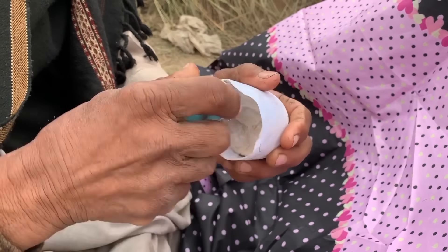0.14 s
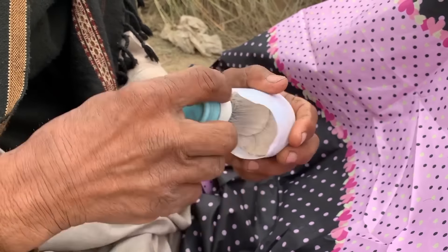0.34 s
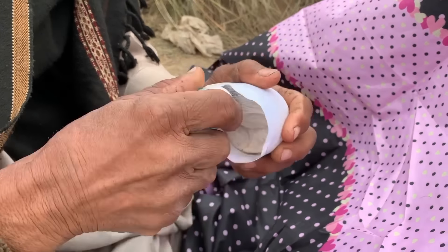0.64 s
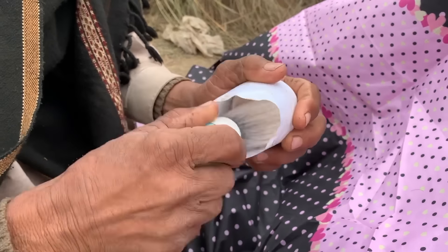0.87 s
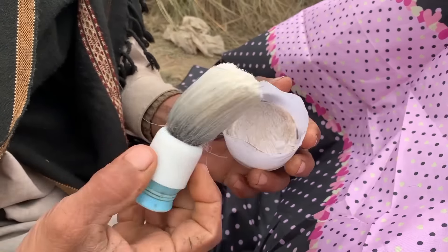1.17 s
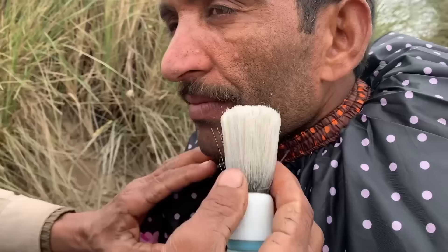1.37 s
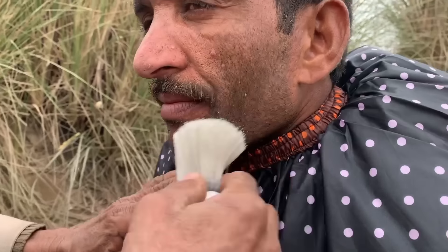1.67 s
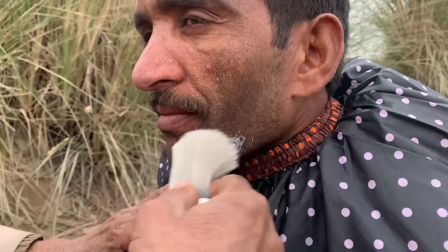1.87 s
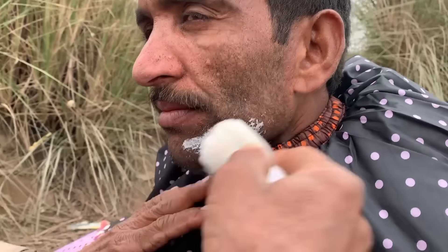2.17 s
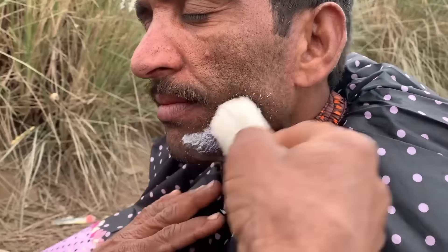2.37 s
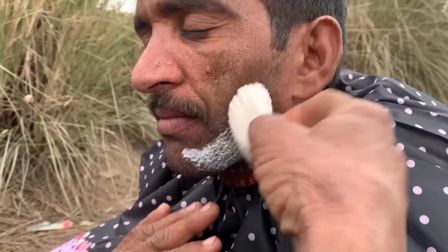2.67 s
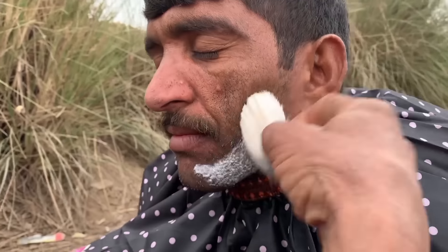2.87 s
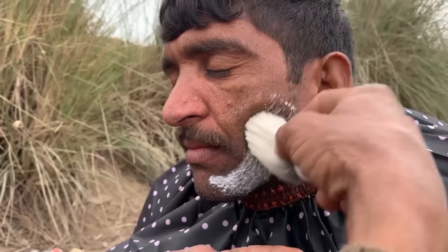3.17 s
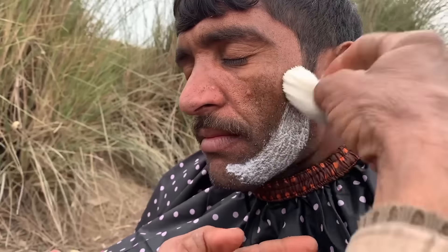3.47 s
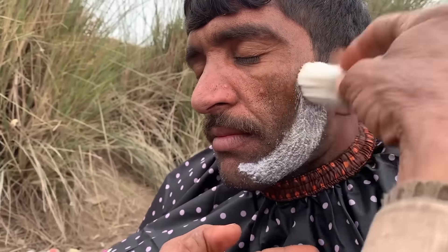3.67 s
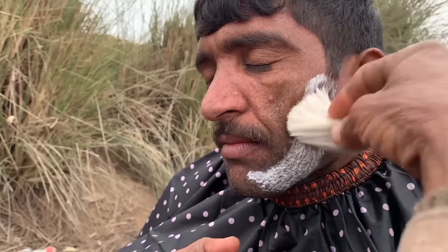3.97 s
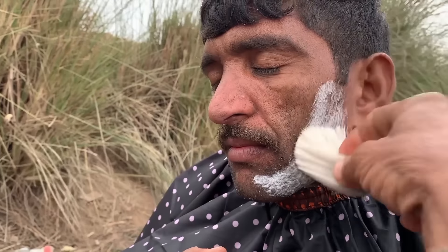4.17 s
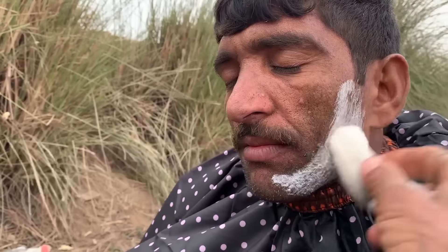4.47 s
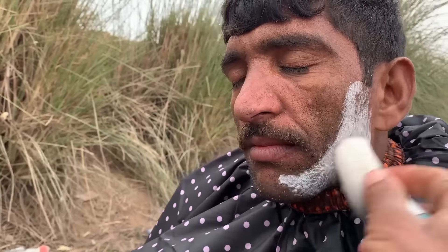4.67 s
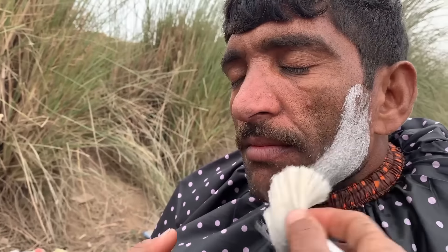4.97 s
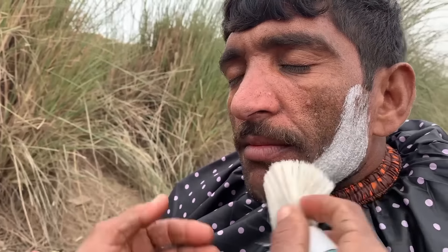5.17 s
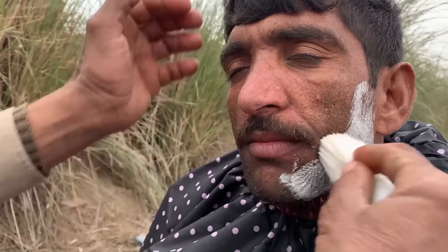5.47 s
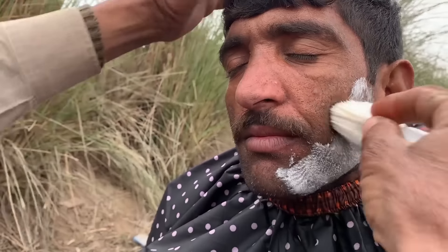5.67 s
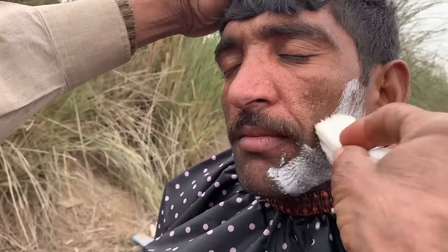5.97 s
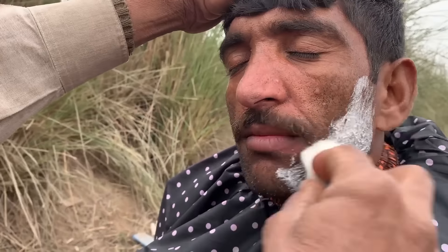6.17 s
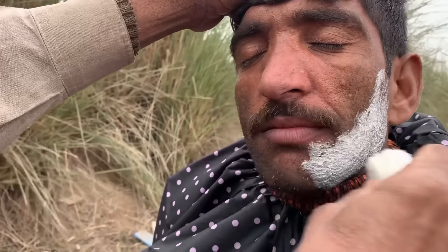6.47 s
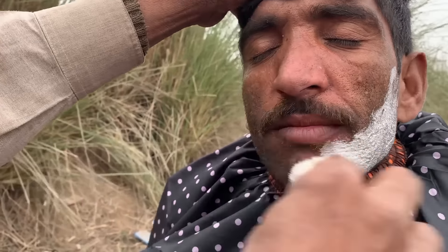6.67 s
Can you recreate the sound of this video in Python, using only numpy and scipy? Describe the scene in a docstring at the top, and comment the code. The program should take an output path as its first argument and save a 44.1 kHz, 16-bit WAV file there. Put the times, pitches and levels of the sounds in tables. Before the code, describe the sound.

A shaving brush swirls briskly in a small plastic cup with ringing knocks, then scrubs rhythmically over a stubbled cheek outdoors in light buffeting wind.

```python
"""Outdoors, close to two microphone ports, a shaving brush is swirled in a small plastic cup: tips hiss, the knot rubs.
Both are uneven noise slips swelling with each stroke; wind rumbles and air rustles as shaped noise from the start.
At once the handle knocks ringing cup modes, falling-pitch puffs strike the ports and tufts flick free in short bursts.
At 1.34 s the brush and microphone turn to a stubbled cheek, with a new rub spectrum and a moving lag between the ports.
Soon after, a far bird coos twice in wavering sines; brush and wind carry on to the end."""
import sys
import numpy as np
from scipy import signal
from scipy.fft import rfft, irfft, next_fast_len
from scipy.io import wavfile
from scipy.ndimage import map_coordinates

SR = 44100
rng = np.random.default_rng(int(sys.argv[2]) if len(sys.argv) > 2 else 0)


def output_pcm(signal):
    """Save a mono or channel-first signal as 16-bit PCM at the path in sys.argv[1].

    Samples are clipped to [-1, 1] before scaling.
    """
    pcm = np.clip(np.atleast_2d(signal).T, -1, 1) * 32767
    wavfile.write(sys.argv[1], SR, np.round(pcm).astype(np.int16))


N = 301203
T = np.arange(N) / SR
SIZE = next_fast_len(N + 4096)
HZ = np.maximum(np.arange(SIZE // 2 + 1) * SR / SIZE, 1)
LIFT_S = 1.34   # from here the microphone faces the cheek
SIDES = np.array([[1], [-1]])   # left, right


def amp(db):
    """Decibels to gain."""
    return 10 ** (np.asarray(db) / 20)


def rms_one(x):
    """Scale to unit rms."""
    return x / np.sqrt(np.mean(x ** 2) + 1e-20)


def colour(x, spectrum):
    """Shape a flat source by a (frequency [Hz], level [dB]) spectrum, keeping its power."""
    hz, level_db = np.transpose(spectrum)
    gain = rms_one(amp(np.interp(np.log(HZ), np.log(hz), level_db)))
    return irfft(rfft(x, SIZE) * gain, SIZE)[..., :N]


def above(x, edge_hz):
    """Steep high-pass."""
    return signal.sosfilt(signal.butter(6, edge_hz, "high", fs=SR, output="sos"), x + 1e-18)


def drift(rate_hz):
    """Slow chance of spread 1: noise twice through a one-pole low-pass."""
    r = np.exp(-2 * np.pi * rate_hz / SR)
    noise = rng.standard_normal(N + SR)
    return rms_one(signal.lfilter([1], [1, -2 * r, r * r], noise)[SR:])


def ring(clicks, hz, t60):
    """A unit click sets a decaying sine of starting height 1 ringing."""
    r, w = amp(-60 / (t60 * SR)), 2 * np.pi * hz / SR
    return signal.lfilter([0, np.sin(w)], [1, -2 * r * np.cos(w), r * r], clicks + 1e-18)


def spikes(times, gains):
    """A click train."""
    out = np.zeros(N)
    out[np.round(np.asarray(times) * SR).astype(int)] = gains
    return out


def swell(s, rise, fall):
    """Power of one movement: a smooth bump of height 1 with its top at s."""
    at = slice(max(0, int((s - rise) * SR)), int((s + fall) * SR))
    u = np.where(T[at] < s, (s - T[at]) / rise, (T[at] - s) / fall)
    return at, np.clip(1 - u ** 2, 0, 1) ** 3


# treble at the port pair, where the left simply lags, so the two cancel near 8.5 and 13.5 kHz:
# (frequency [Hz], left lead [rad], likeness [0-1], left over right [dB])
PORTS_TOP = [(8000, -2.6, .95, 0), (8550, -3.14, .998, 0), (9100, -3.8, .95, 0), (11400, -6.5, .95, 0),
             (13000, -8.8, .95, 0), (13500, -9.42, .998, 0), (14000, -10.1, .95, 0), (15300, -12.5, .95, 0)]


def ports(shared, own, table):
    """Each port hears the shared sound with its own phase and level, plus a scattered part of its own."""
    hz, lead, alike, pan_db = np.transpose(table + PORTS_TOP)
    side = SIDES / 2
    alike = np.clip(np.interp(HZ, hz, alike), 0, 1)
    phase = np.exp(1j * side * np.interp(HZ, hz, lead))
    direct = np.sqrt(alike) * rfft(shared, SIZE) * phase
    both = direct + np.sqrt(1 - alike) * rfft(own, SIZE)
    return irfft(both * amp(side * np.interp(HZ, hz, pan_db)), SIZE)[:, :N]


# brush strokes, about ten a second:
# (time of fastest motion [s], length [ms], tip hiss [dB], ending [1 swept through, -1 stopped short])
STROKES = [(0.0, 158, -39, 1), (0.106, 114, -46, 1), (0.213, 92, -45.5, -1), (0.31, 220, -51.5, 1),
           (0.343, 36, -40, 1), (0.436, 91, -35, 1), (0.548, 166, -38.5, 1), (0.621, 59, -38.5, 1),
           (0.674, 210, -49, -1), (0.785, 190, -48.5, 1), (0.866, 182, -38, -1), (0.91, 200, -43, 1),
           (0.995, 49, -37, 1), (1.028, 30, -34.5, -1), (1.365, 233, -52, 1), (1.46, 95, -41, 1),
           (1.545, 180, -47.5, 1), (1.644, 103, -39, 1), (1.74, 200, -51.5, 1), (1.854, 96, -36, 1),
           (1.964, 164, -51, 1), (2.061, 104, -36, 1), (2.174, 170, -49.5, -1), (2.269, 109, -38.5, 1),
           (2.383, 120, -49.5, -1), (2.481, 109, -39, 1), (2.606, 104, -44.5, -1), (2.687, 110, -41, 1),
           (2.798, 90, -43, -1), (2.891, 84, -39.5, -1), (3.002, 99, -43.5, -1), (3.101, 94, -43, -1),
           (3.215, 97, -45, -1), (3.299, 104, -46.5, 1), (3.409, 80, -47, -1), (3.513, 93, -45.5, -1),
           (3.616, 115, -45, 1), (3.702, 95, -44.5, 1), (3.807, 53, -46, -1), (3.908, 113, -48, 1),
           (4.025, 98, -45.5, -1), (4.105, 118, -43, 1), (4.232, 108, -49, -1), (4.304, 92, -40, 1),
           (4.399, 130, -46, 1), (4.495, 93, -39.5, 1), (4.608, 99, -51.5, -1), (4.7, 82, -37.5, 1),
           (4.809, 117, -52, -1), (4.904, 102, -40.5, 1), (5.03, 104, -52.5, -1), (5.12, 117, -44, 1),
           (5.208, 87, -53, -1), (5.306, 67, -49, 1), (5.422, 126, -53, -1), (5.497, 50, -48, -1),
           (5.604, 82, -46.5, 1), (5.766, 56, -42.5, 1), (5.878, 108, -48.5, 1), (6.077, 89, -43.5, 1),
           (6.191, 43, -53.5, -1), (6.288, 124, -43, 1), (6.405, 55, -45.5, -1), (6.552, 150, -42.5, 1),
           (6.699, 79, -46.5, -1)]
# how hard the knot is pressed: (time [s], rub of a firm stroke [dB])
PRESSURE = [(0, -51.5), (0.33, -49.5), (0.54, -55.5), (0.63, -40.5), (0.85, -53), (1.35, -43),
            (1.55, -53.5), (1.85, -48), (2.5, -46), (2.9, -52.5), (3.3, -46.5), (3.6, -51.5), (4.1, -47.5),
            (4.5, -44), (5.2, -43.5), (5.5, -47), (5.77, -55), (5.95, -42.5), (6.2, -47), (6.83, -49)]
FIRM_DB, RUB_FOLLOWS = -40, 0.99   # hiss of a firm stroke; dB of rub per dB of hiss
RISE_SHARE_SWEPT, RISE_SHARE_STOPPED = .51, 0.71   # part of a stroke spent swelling


def stroke_gains():
    """Each stroke swells as the brush speeds up and dies as it turns; powers add."""
    tips, rub = np.zeros(N), np.zeros(N)
    for s, length_ms, tip_db, ending in STROKES:
        share = RISE_SHARE_SWEPT if ending > 0 else RISE_SHARE_STOPPED
        at, power = swell(s, share * length_ms / 1000, (1 - share) * length_ms / 1000)
        tips[at] += power * amp(2 * tip_db)
        firm_rub_db = np.interp(s, *np.transpose(PRESSURE))
        rub[at] += power * amp(2 * (firm_rub_db + RUB_FOLLOWS * (tip_db - FIRM_DB)))
    return settling(np.sqrt(tips), 0.022, 0.26), settling(np.sqrt(rub), 0.018, 0.24)


def settling(gain, share, t60):
    """Lather keeps fizzing faintly after each stroke, so the power lingers."""
    keep = amp(-120 / (t60 * SR))
    return np.sqrt(gain ** 2 + share * signal.lfilter([1 - keep], [1, -keep], gain ** 2))


def bristles(slips_per_s, spread_db, clump_db):
    """Dense uneven slips of single hairs, in clumps; three paths (shared, left, right) of the same slips."""
    sizes = amp(spread_db * np.minimum(rng.exponential(1, N), 5))
    slips = (rng.random(N) < slips_per_s / SR) * sizes
    grain = np.sqrt(signal.lfilter([1], [1, -.93], slips ** 2) + 1e-12)   # a slip lasts a fraction of a ms
    clumped = rms_one(grain * amp(clump_db * drift(29.0)))
    return clumped * rng.standard_normal((3, N))


def patchy(x, low_db, high_db, patch_db, rate_hz):
    """Narrow bands waver each on their own as different tufts bend; low and high bands take a trim."""
    edges = [0, 500, 750, 1000, 1400, 2000, 2600, 3400, 4300, 5400, 6700, 8500, 11000, 13500, SR]   # Hz
    out, spectrum = 0, rfft(x, SIZE)
    for low, high in zip(edges, edges[1:]):
        band = irfft(spectrum * (HZ >= low) * (HZ < high), SIZE)[:, :N]
        trim_db = low_db if high <= 1000 else high_db if low >= 2000 else 0
        out = out + band * amp(trim_db + patch_db * drift(rate_hz))
    return out


SCRATCH_DB, SCRATCH_PER_S, SCRATCH_CYCLES = -7.5, 1500, 20   # level over the rub, rate, ring length to -60 dB


def scratches():
    """Stiff hairs catch and twang at their own pitch; each pitch comes and goes as other tufts touch."""
    sizes = amp(2.7 * np.minimum(rng.exponential(1, N), 3)) * rng.choice([-1, 1], N)
    catches = sizes * (rng.random(N) < SCRATCH_PER_S / SR)
    dealt = rng.integers(0, 12, N)   # which pitch each catch twangs
    out = np.zeros(N)
    for k, hz in enumerate(np.geomspace(800, 6000, 12)):
        touching = catches * (dealt == k) * amp(3.4 * drift(5.7))
        out += ring(touching, hz, SCRATCH_CYCLES / hz) * hz ** 0.77
    return amp(SCRATCH_DB) * rms_one(out)


# the brush travels over jaw and cheek; the first row also holds for the time in the cup, where the lead is unused:
# (time [s], warmth [dB], rasp [dB], left lead below the treble [samples])
SKIN = [(1.3, -3.5, 7, 3.4), (2.0, -8, 1.5, 4.2), (2.7, 0, -4.5, 5.6), (3.0, -1.5, 1, 5.1),
        (3.5, 0.5, -3, 3.8), (4.1, -7.5, 1, 0.66), (4.9, -10.5, 4.5, 1.3), (5.5, 1, 0, 2.6),
        (6.1, -11, 1, 0.57), (6.8, 2, 8, 1.8)]
# spectra of tip hiss, rub in the cup and rub on the cheek: (frequency [Hz], relative density [dB per Hz])
TIPS = [(3000, -11), (6000, -6.5), (8000, -2.5), (9500, 3.5), (11300, 5.5), (12400, -0.5), (14000, 9.5),
        (14600, -5.5), (15200, 3), (16000, -39)]
RUB_CUP = [(250, -39), (550, 3), (800, -4), (950, 8.5), (1150, -4), (1500, -3), (2400, -11), (4000, -10),
           (5500, -13.5), (8000, -11), (12000, -20)]
RUB_FACE = [(250, -14.5), (500, 1.5), (900, -3.5), (1400, -1), (2200, -5.5), (3200, -11), (5000, -7),
            (7000, -9.5), (12000, -12.5)]
# the port pair over the cup and facing the cheek:
# (frequency [Hz], left lead [rad], likeness [0-1], left over right [dB])
PORTS_CUP = [(100, 2.5, 1, 0.5), (890, 0, 0.74, -1.5), (2320, 3, 0.73, 1.5), (4370, 3.5, 0.05, -5.5),
             (5800, 4, 0.5, -4), (6900, -1 , 0.3, 0)]
PORTS_FACE = [(250, -0.15, 1, 1.5), (480, -0.8, 0.73, -1), (920, -1.27, 0.66, -1.5), (1700, 0.9, 0.8, -3.5),
              (3180, 0.81, 0.079, 0), (4680, -1.9, 0.34, -6), (5770, 0.42, 0.45, -4)]


def brush():
    """Tip hiss and pressed rub, heard first from the cup with its knocks and then from the cheek."""
    tips, rub = stroke_gains()
    skin_s, *columns = np.transpose(SKIN)
    warm_db, rasp_db, lead = [np.interp(T, skin_s, column) for column in columns]
    tip_slips = patchy(bristles(5000, 0.94, 2.43), 0, 0, patch_db=1.27, rate_hz=41.0)
    hiss = colour(tips * tip_slips + flicks(0.018), TIPS)
    drag = rub * patchy(bristles(2000, 0.67, 2.17), warm_db, rasp_db, patch_db=2.0, rate_hz=19.4)
    drag[0] += rub * scratches()
    in_cup = T < LIFT_S
    cup = hiss * in_cup + colour(drag * in_cup, RUB_CUP) + knocks()
    face = hiss * ~in_cup + colour(drag * ~in_cup, RUB_FACE)
    return ports(cup[0], cup[1:], PORTS_CUP) + moving(ports(face[0], face[1:], PORTS_FACE), lead)


def moving(pair, lead):
    """Below 6 kHz the arrival difference follows the brush: each side is read half the lead early or late."""
    low = irfft(rfft(pair, SIZE) / (1 + (HZ / 6000) ** 80), SIZE)[:, :N]
    read = []
    for k in range(2):
        when = np.arange(N) + lead * (.5 - k)
        read.append(map_coordinates(low[k], [when], order=3, mode="nearest"))
    return pair - low + read


# steady wind: (time [s], rumble [dB], flutter over the rumble [dB])
WIND = [(0, -34.5, -7), (0.4, -35.5, -17.5), (0.5, -39.5, -32), (0.77, -40, -12), (1.1, -29, -3.5),
        (1.36, -47, -13), (2.1, -45.5, -14), (3.0, -41.5, -14), (3.65, -40.5, -14.5), (3.8, -46.5, -9.5),
        (4.4, -43.5, -15.5), (5.5, -43, -12), (5.76, -51, -5), (6.0, -33, -11), (6.3, -34, -10.5),
        (6.7, -37.5, -5.5), (6.83, -51, -18)]
# spectra of the wind's low and upper parts: (frequency [Hz], relative density [dB per Hz])
RUMBLE = [(12, -53), (22, -24), (41, 2), (70, 4), (105, -2.5), (150, -17.5), (300, -101)]
FLUTTER = [(60, -37), (120, 2.5), (170, 1), (250, -12.5), (350, -17.5), (600, -46.5), (1200, -88)]
TURNED_S = (3.92, 5.95)   # between these times the flutter differs more between the ports


def wind():
    """Lumpy low noise with gusts and puffs; the ports feel it less alike before the microphone turns."""
    s, rumble_db, flutter_db = np.transpose(WIND)
    steady = amp([2 * np.interp(T, s, rumble_db), 2 * np.interp(T, s, rumble_db + flutter_db)])
    power = steady + gusts()
    unlike = .35 * (T < LIFT_S) * SIDES
    lumps = rms_one(amp([2.5 * drift(25.0), 4.1 * drift(19.0)]))   # rumble, flutter
    mid, side = rng.standard_normal((2, 2, N)) * lumps
    out = puffs(97.3, 0.01076, 1.95)
    out = out + 0.36 * SIDES * above(out, 310.0)   # small eddies strike one port harder
    for k, spectrum in enumerate([RUMBLE, FLUTTER]):
        out = out + np.sqrt(power[k]) * (colour(mid[k], spectrum) + unlike * colour(side[k], spectrum))
    scattered = np.sqrt(power[1]) * colour(side[1], FLUTTER) * (T >= LIFT_S)
    later = np.clip(np.minimum(T - TURNED_S[0], TURNED_S[1] - T) / .15, 0, 1)
    return out + SIDES * (0.27 * above(scattered, 380.0) + 0.56 * later * above(scattered, 200.0))


# spectra of the air facing the cheek and over the cup: (frequency [Hz], relative density [dB per Hz])
AIR = [(150, -8), (500, -3.5), (1400, -7), (2800, -8.5), (5000, -9.5), (7000, -13.5), (11000, -7),
       (14000, -6.5), (15200, -19)]
AIR_CUP = [(150, -12), (500, 0), (2400, -3.5), (5000, -10.5), (6500, -17), (11000, -12), (15200, -9)]
AIR_DB = -61   # facing the cheek


def air():
    """Faint rustle of grass and cloth under everything, duller while the microphone points down at the cup."""
    noise = amp(AIR_DB + 0.9 * drift(1.0)) * rng.standard_normal((3, N))
    noise = colour(noise * (T >= LIFT_S), AIR) + amp(-2.0) * colour(noise * (T < LIFT_S), AIR_CUP)
    return ports(noise[0], noise[1:], PORTS_FACE)


# handle against the cup: (time [s], strength [dB], brightness [dB], depth [dB], favoured high pitch [Hz])
KNOCKS = [(0.04, -30.5, -22, -27, 4000), (0.095, -35.5, -1, 10, 2920), (0.1, -31, -4, -15, 4800),
          (0.204, -26, -17, -31, 4840), (0.218, -31, -16, -3, 3000), (0.339, -31.5, 8.5, 9.5, 2990),
          (0.344, -24, -15, 2.5, 4800), (0.435, -36, 6.5, -18, 2950), (0.608, -33, 9.5, -20, 3740),
          (0.618, -33.5, 10, -11, 4890), (0.622, -30, -7, 5, 3000), (0.687, -38, 4.5, 6, 2820),
          (0.873, -42, 7, -10, 4800), (0.881, -27, -9, 1, 3510), (0.9, -23, -17, -19, 3000),
          (0.908, -30, -5, -4, 4680), (0.994, -45, 7, -12, 3000), (1.025, -36, -14, -13, 4800),
          (1.306, -37, -20, -15, 3000), (1.312, -35, -14, -21, 3600)]
# resonances of the plastic cup: (frequency [Hz], relative level [dB], decay by 60 dB [s])
CUP_MODES = [(645, -3.5, 0.04), (734, -3, 0.034), (965, 2.5, 0.021), (1070, -1.5, 0.018),
             (1480, 1.5, 0.013), (1900, 3.5, 0.0058), (2910, 11.5, 0.016), (3680, 10.5, 0.011),
             (4840, 16, 0.01)]
TICK_FALL_DB = 67   # high modes lose this much per squared octave away from the favoured one


def knocks():
    """Every knock is a brief rattle into all cup modes, plus a crack; where it lands sets its colour."""
    s, strength_db, bright_db, deep_db, tick_hz = np.transpose(KNOCKS)
    luck_db = rng.normal(0, 1.5, (len(s), len(CUP_MODES)))
    out, rattle = np.zeros(N), rng.standard_normal(N)
    for k, (hz, level_db, t60) in enumerate(CUP_MODES):
        tilt_db = bright_db * np.clip(np.log2(hz / 1400), 0, 1) + deep_db * (hz < 850)
        tilt_db = tilt_db - (hz > 2500) * TICK_FALL_DB * np.log2(hz / tick_hz) ** 2
        hit = spikes(s, amp(strength_db + level_db + tilt_db - 15.5 + luck_db[:, k]))
        rattling = 0.14 * rattle * signal.lfilter([1], [1, -.99], hit)
        out += ring(soft(hit) + rattling, hz, t60)
    crack = signal.lfilter([1], [1, -.96], spikes(s, amp(strength_db + bright_db - 7.0)))
    return out + signal.lfilter([.6], [1, -.5], crack * rattle)   # a plastic crack is slightly dull


def soft(clicks):
    """Lather cushions a contact: the click is spread a little."""
    return signal.lfilter([.35], [1, -.75], clicks)


# sudden eddies at the ports: (time [s], level [dB], starting pitch [Hz])
PUFFS = [(0.078, -45, 448), (0.138, -26, 292), (0.23, -34.5, 268), (0.432, -33, 189), (0.6, -28.5, 307),
         (0.63, -26, 335), (.679, -25.5, 221), (0.813, -33, 237), (.889, -25.5, 450), (0.979, -24.5, 292),
         (1.007, -29, 270), (1.018, -19, 306), (1.033, -22, 305), (1.058, -25, 263), (1.12, -19, 497),
         (1.181, -37, 370), (1.214, -29, 228), (1.522, -32, 197), (5.85, -41.5, 295), (5.926, -44, 326),
         (5.998, -44, 332), (6.08, -33.5, 666), (6.141, -22, 270), (6.343, -38.5, 433), (6.408, -33.5, 382),
         (6.495, -41.5, 370), (6.656, -39, 333), (6.692, -47.5, 610)]


def puffs(end_hz, glide_s, cycles):
    """An eddy passing the ports: a few cycles at most, whose pitch falls as it swells and dies."""
    out, t = np.zeros(N), np.arange(int(.06 * SR)) / SR
    for s, level_db, hz in PUFFS:
        start, stretch = rng.random(2)
        turns = start + end_hz * t + (hz - end_hz) * glide_s * (1 - np.exp(-t / glide_s))
        age = t * np.sqrt(hz * 280) / cycles / (.7 + .6 * stretch)   # 1 at the top of the swell
        at = int(s * SR)
        envelope = (age * np.exp(1 - age)) ** 1.5
        out[at:at + len(t)] += amp(level_db) * envelope * np.sin(2 * np.pi * turns)
    return out


# the clearest tufts springing free: (time [s], burst strength [dB])
FLICKS = [(0.0964, -37), (0.338, -26.5), (0.395, -41), (0.897, -27), (1.4594, -40), (1.6217, -31),
          (1.8005, -31.5), (2.005, -36.5), (2.221, -39.5), (2.6399, -41), (2.843, -40), (2.9574, -41),
          (3.059, -41), (3.403, -32), (3.4775, -42), (3.647, -36), (4.454, -44), (4.666, -35.5),
          (4.856, -34), (4.879, -30.5), (5.062, -42), (5.075, -32.5), (5.2625, -39), (5.301, -44),
          (5.342, -39.5), (5.428, -38), (5.661, -39.5), (5.752, -36), (5.534, -45), (5.839, -42),
          (6.0253, -45), (6.043, -39), (6.221, -46), (6.4527, -37.5), (6.524, -31)]


def flicks(t60):
    """A released tuft gives a short bright burst that builds within a millisecond."""
    s, strength_db = np.transpose(FLICKS)
    burst = signal.lfilter([1], [1, -amp(-60 / (t60 * SR))], spikes(s, amp(strength_db)))
    return signal.lfilter([.08], [1, -.92], burst) * rng.standard_normal((3, N))


# buffets: (time of the top [s], length [ms], rumble [dB], flutter over the rumble [dB])
GUSTS = [(0.66, 270, -28, -10.5), (0.85, 140, -27.5, -8.5), (0.916, 44, -22.5, -8.5),
         (1.024, 72, -26, -3.5), (1.09, 86, -33, -4), (1.191, 42, -31.5, -4.5), (1.227, 46, -20, -14),
         (1.312, 85, -29, -7), (1.49, 104, -33.5, -17), (1.56, 91, -38, -20), (2.201, 120, -35, -13),
         (2.362, 160, -39.5, -24), (2.647, 54, -32.5, -13), (2.88, 220, -33, -24), (3.69, 64, -33, -36),
         (4.319, 166, -31.5, -39), (5.0, 48, -34.5, -40), (5.948, 79, -24.5, -15), (6.04, 102, -25, -28),
         (6.137, 146, -22.5, -5.5), (6.681, 63, -29.5, -6.5)]


def gusts():
    """Each buffet adds a smooth bump to the power of the wind's rumble and flutter."""
    power = np.zeros((2, N))
    for s, length_ms, rumble_db, flutter_db in GUSTS:
        at, bump = swell(s, length_ms / 2000, length_ms / 2000)
        power[:, at] += bump * amp([[2 * rumble_db], [2 * (rumble_db + flutter_db)]])
    return power


# far bird: (time of the middle [s], length [ms], pitch [Hz], left peak level [dB])
COOS = [(1.6, 80, 844, -63), (1.92, 340, 847, -61)]


def dove():
    """A far bird coos faintly from one side: near-pure notes that waver a little."""
    out = np.zeros(N)
    for s, length_ms, hz, level_db in COOS:
        at, power = swell(s, length_ms / 2000, length_ms / 2000)
        pitch = hz * (1 + .008 * drift(4)[at])
        out[at] += amp(level_db) * power ** .25 * np.sin(2 * np.pi * np.cumsum(pitch) / SR)
    return out * np.array([[1], [-.3]])   # weaker and inverted on the right


def scene():
    """Brush, wind, air and a far bird."""
    return brush() + wind() + air() + dove()


def record(dry):
    """The top is cut steeply, 70 dB down from 16489 Hz."""
    return signal.sosfilt(signal.cheby2(12, 70, 16489, fs=SR, output="sos"), dry)


dry = scene()
out = record(dry)
output_pcm(out)
```